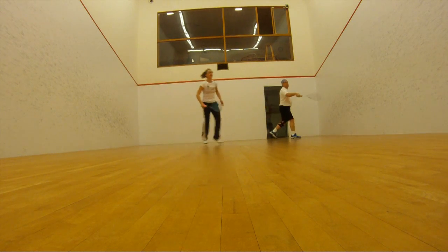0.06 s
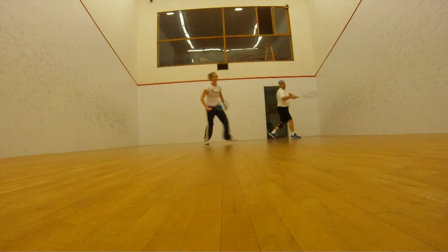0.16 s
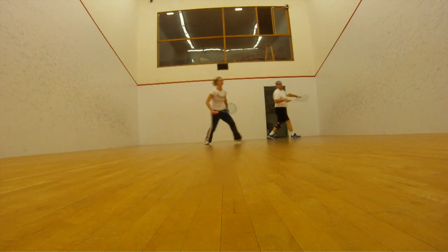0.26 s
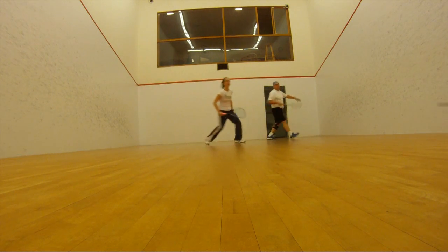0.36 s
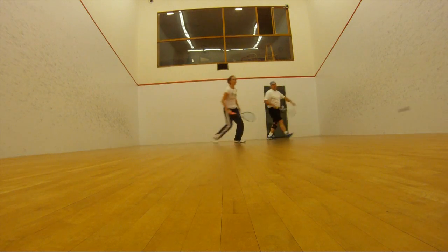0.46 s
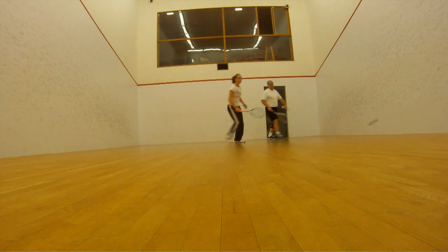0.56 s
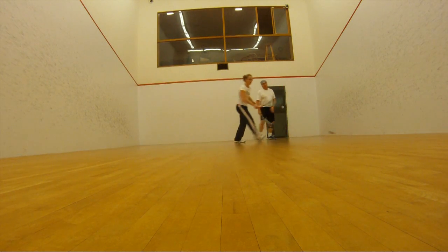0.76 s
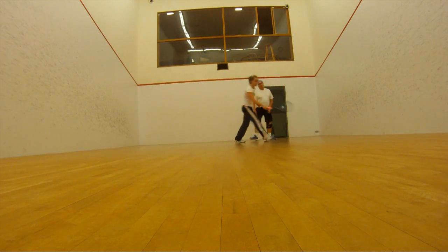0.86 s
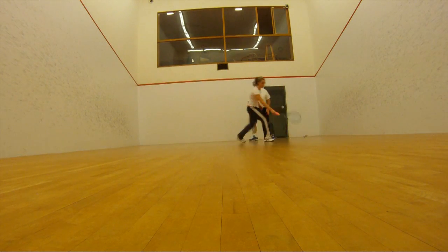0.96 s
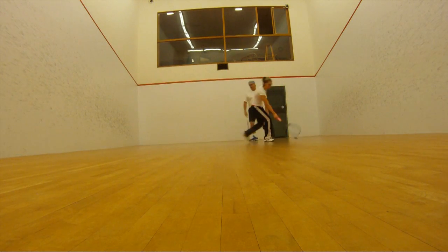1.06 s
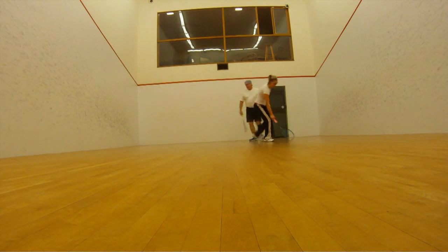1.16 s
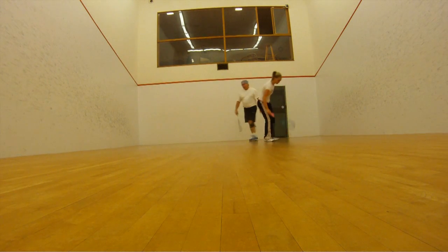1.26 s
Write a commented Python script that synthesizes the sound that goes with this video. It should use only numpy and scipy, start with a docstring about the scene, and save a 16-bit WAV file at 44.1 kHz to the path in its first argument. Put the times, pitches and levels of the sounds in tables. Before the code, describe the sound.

A racket hits a squash ball once with a sharp, hollow crack. Quick echoes merge into a long, bright reverberation in the bare indoor court, while shoes thud softly and squeak faintly, heard from floor level.

```python
"""A squash ball is hit hard in a bare indoor court.
First the wash of the rally hangs in the room, fading over steady air.
Then the hit: a bright snap, a sharp crack, and struck modes that give a hollow ring and a low thump.
The walls throw back four slaps, which merge into a long bright reverberation over a boom.
In that tail, shoes thud on the sprung floor and squeak faintly."""
import sys
import numpy as np
from scipy import signal
from scipy.fft import rfft, irfft
from scipy.io import wavfile

SR = 44100
rng = np.random.default_rng(int(sys.argv[2]) if len(sys.argv) > 2 else 0)


def materialize(psi):
    """Save the field psi as 16-bit PCM at rate SR to the path in sys.argv[1].

    A 1-D psi becomes a single channel; in a 2-D psi each row is a channel.
    """
    bounded = np.clip(np.atleast_2d(psi).T, -1, 1)
    quanta = np.round(bounded * 32767).astype(np.int16)
    wavfile.write(sys.argv[1], SR, quanta)


N = 57330

# steady air of the hall (frequency [Hz], relative density [dB])
AIR_SPECTRUM = [(40, -18), (120, -2), (300, -8), (700, -10), (1100, -0.5), (1500, -12), (2500, -12.5),
                (5000, -44), (15000, -58)]
# wash of the rally (frequency [Hz], relative density [dB])
WASH_SPECTRUM = [(24, -73), (40, -43), (111, -28), (146, -30), (174, -51), (224, -15), (387, -9.5),
                 (522, -4), (758, -35), (838, -10.5), (1020, -5.5), (1250, -3), (1410, -14), (1640, -7.5),
                 (1770, -16.5), (2010, -0.5), (2450, -14.5), (2710, -30), (2990, -14.5), (5050, -25),
                 (6010, -34.5), (9650, -18.5), (11800, -32.5), (14400, -21), (15500, -34)]
# notes hanging from earlier play (frequency [Hz], width [Hz], level [dB])
WASH_RESONANCES = [(996, 94, -45.5), (1270, 150, -51), (1988, 120, -48), (2714, 180, -47.5)]
# footfalls (time [s], level [dB])
FOOTFALLS = [(0.449, -44), (.515, -32), (.82, -62), (1.0, -44.5), (1.1, -44.5), (1.191, -43)]
# distant shoe squeaks (time [s], frequency [Hz], level [dB])
SHOE_SQUEAKS = [(1.02, 542.6, -46.5), (1.07, 783, -48), (1.085, 1060, -48), (1.091, 525, -50.5),
                (1.194, 534, -45), (1.2, 1076, -58), (1.246, 539, -52)]
# court reverberation (frequency [Hz], relative density [dB])
REVERB_SPECTRUM = [(24, -47), (40, 1.5), (64, -7), (120, 3.5), (197, 1), (325, -4.5), (368, -9.5),
                   (704, -15), (881, -10), (1100, -7.5), (1380, -12.5), (1490, -6.5), (1820, -7),
                   (2110, -1), (2510, -8.5), (3740, -7.5), (4460, -20.5), (5170, -15), (5860, -31.5),
                   (6810, -19), (7710, -21.5), (9650, -14), (11800, -36), (14000, -26), (15500, -33)]
# its decay (frequency [Hz], T60 [s])
REVERB_DECAY = [(70, 2.4), (200, 1.06), (500, 3.94), (1100, 3.6), (2100, 3.2), (3500, 2), (6000, 1.57),
                (9500, 1.92), (14000, 6.4)]
# notes of the hit lingering in the court (frequency [Hz], width [Hz], level [dB])
REVERB_RESONANCES = [(878, 50, -41.5), (1111, 106, -39.5), (1520, 68, -41.5), (2057, 48, -37),
                     (2200, 200, -33.5), (3604, 130, -47.5), (8400, 940, -44), (9900, 430, -47),
                     (14300, 650, -42.5)]
# far-wall returns (delay [s], level relative to the reverberation [dB])
WALL_SLAPS = [(.066, -7), (0.074, 1), (.121, -2), (.1435, -4)]
# snap at contact (frequency [Hz], relative density [dB])
SNAP_SPECTRUM = [(1000, -25), (3000, -19), (4400, 2.5), (6000, -13), (7100, -2), (8300, -2), (10500, 6),
                 (12000, -33), (14000, -12)]
# crack of the hit (frequency [Hz], relative density [dB])
CRACK_SPECTRUM = [(24, -47), (40, -20), (85, -14), (158, -11), (218, -11.5), (449, -17), (881, -4),
                  (973, -12.5), (1100, 0.5), (1310, -16), (1450, -11), (1680, -4), (2330, -7.5), (2510, -2),
                  (2840, -12), (3740, -7), (4030, -24), (5050, -14.5), (6010, -28), (8110, -19),
                  (10100, -23), (11200, -28), (12100, -55), (13300, -19.5), (15500, -28)]
# its decay (frequency [Hz], T60 [s])
CRACK_DECAY = [(100, 0.18), (400, 0.32), (1000, 0.22), (2500, 0.11), (5000, 0.17), (14000, 0.24)]
# modes rung by the hit (frequency [Hz], relative level [dB], T60 [s])
STRUCK_MODES = [(111.4, -31.5, 1.2), (175.6, -23.5, 0.66), (210, -20, 0.61), (304.2, -26.5, 0.6),
                (726.3, -20, 0.24), (906, -15, 0.17), (1092, -15.5, 0.33), (1099, -15.5, 0.19),
                (1430, -16.5, 0.1), (1670, -12, 0.097), (1740, -15, 0.11), (1924, -21.5, 0.28),
                (2177, -18, 0.22), (2467, -22, 0.084), (2650, -6.5, 0.067), (3735, -15, 0.077)]

HIT_S = 0.2365
AIR_DB, WASH_DB = -46, -37
REVERB_DB, REVERB_BUILD_S, BOOM_DB = -23.5, 0.038, -34.5
SNAP_DB, CRACK_DB, RING_DB = -20, -13, -2
LOW_CUT_HZ, HIGH_CUT_HZ, NOTCH_HZ = 63, 15250, 12000
DIP_HZ, DIP_WIDTH_HZ, DIP_DEPTH = 6100, 550, 0.46

TIME_S = np.arange(N) / SR
BIN_HZ = np.arange(N // 2 + 1) * SR / N


def undb(db):
    """Decibels to gain."""
    return 10 ** (np.asarray(db) / 20)


def on_log_axis(hz, points):
    """Interpolate (frequency [Hz], value) points over log frequency."""
    point_hz, values = np.array(points, float).T
    return np.interp(np.log(np.maximum(hz, 1)), np.log(point_hz), values)


def diffuse(gain):
    """Sound arriving by countless paths: given spectrum, random phases, rms 1."""
    x = irfft(gain * np.exp(2j * np.pi * rng.random(len(gain))), N)
    return x / x.std()


def coloured(spectrum):
    """Diffuse sound shaped by (frequency [Hz], relative density [dB]) points."""
    return diffuse(undb(on_log_axis(BIN_HZ, spectrum)))


def resonant(hz, width_hz):
    """Diffuse sound around one resonance."""
    return diffuse(1 / (1 + ((BIN_HZ - hz) / width_hz * 2) ** 4))


def notes(resonances):
    """Sum of narrow diffuse resonances."""
    return sum(undb(db) * resonant(hz, width_hz) for hz, width_hz, db in resonances)


def envelope(start_s, rise_s, t60_s, hold_s=0):
    """Linear attack; exponential decay from hold_s after the start."""
    age_s = TIME_S - start_s
    attack = np.clip(age_s / max(rise_s, 1 / SR), 0, 1)
    return attack * undb(-60 * np.maximum(age_s - hold_s, 0) / t60_s)


def die_away(x, decay, start_s, rise_s, hold_s=0):
    """Fade each octave at its own T60."""
    octave = np.log2(np.clip(BIN_HZ, 64, 16384))
    spectrum, faded = rfft(x), 0
    for k in range(6, 15):
        band = irfft(spectrum * np.maximum(1 - abs(octave - k), 0), N)
        faded = faded + band * envelope(start_s, rise_s, on_log_axis(2 ** k, decay), hold_s)
    return faded


def hall():
    """Wash and notes of earlier play fade over steady air."""
    wash = undb(WASH_DB) * coloured(WASH_SPECTRUM) + notes(WASH_RESONANCES)
    air = undb(AIR_DB) * coloured(AIR_SPECTRUM)
    return wash * envelope(0, rise_s=0, t60_s=2.78) + air


def shoes():
    """Dull footfalls on the sprung floor and faint squeaks, smeared by the room."""
    thuds = sum(undb(db) * resonant(hz=172, width_hz=44) * envelope(at_s, rise_s=0.007, t60_s=0.18)
                for at_s, db in FOOTFALLS)
    squeaks = sum(undb(db) * resonant(hz, width_hz=11.7) * envelope(at_s, rise_s=0.0095, t60_s=0.79)
                  for at_s, hz, db in SHOE_SQUEAKS)
    return thuds + squeaks


def reverberation():
    """Reflections merge into a long tail with a slow boom and lingering notes."""
    tail = undb(REVERB_DB) * die_away(coloured(REVERB_SPECTRUM), REVERB_DECAY, HIT_S, REVERB_BUILD_S)
    boom = undb(BOOM_DB) * resonant(hz=77, width_hz=22) * envelope(HIT_S, rise_s=0.072, t60_s=0.86)
    lingering = notes(REVERB_RESONANCES) * envelope(HIT_S, REVERB_BUILD_S, t60_s=2.6)
    return tail + boom + lingering


def wall_slaps():
    """The far walls return short bursts in the court's colour, with stronger notes."""
    bursts = sum(undb(db) * envelope(HIT_S + delay_s, rise_s=0.0012, t60_s=0.017, hold_s=0.0033)
                 for delay_s, db in WALL_SLAPS)
    reflected = undb(REVERB_DB) * coloured(REVERB_SPECTRUM) + 2 * notes(REVERB_RESONANCES)
    return bursts * reflected


def ball_hit():
    """Contact snap, a crack thickened by the nearest surfaces, and the ring of the struck modes."""
    crack = die_away(coloured(CRACK_SPECTRUM), CRACK_DECAY, HIT_S, rise_s=0.0035, hold_s=0.016)
    ring = 0
    for hz, db, t60_s in STRUCK_MODES:
        mode = np.sin(2 * np.pi * (hz * TIME_S + rng.random()))
        ring = ring + undb(db) * mode * envelope(HIT_S, rise_s=0.0075, t60_s=t60_s)
    snap = coloured(SNAP_SPECTRUM) * envelope(HIT_S, rise_s=0.0026, t60_s=0.039, hold_s=0.0056)
    return undb(SNAP_DB) * snap + undb(CRACK_DB) * crack + undb(RING_DB) * ring


def scene():
    """Mono mix, heard from the floor at one end of the court."""
    return (ball_hit() + reverberation() + wall_slaps() + shoes() + hall())[None]


def housing(x, above_hz=3800, gain=0.4):
    """The microphone's case adds a brief diffuse ring that ripples the treble."""
    ring = diffuse(1. * (BIN_HZ > above_hz)) * envelope(0, rise_s=0, t60_s=0.022)
    ring = gain * ring / np.sqrt(np.sum(ring ** 2))
    return x + signal.fftconvolve(x, ring[None])[:, :N]


def record(dry):
    """Microphone: case ring, rounded peaks, low cut, two treble notches, high cut."""
    x = np.tanh(housing(dry))
    x = signal.sosfilt(signal.butter(4, LOW_CUT_HZ, "high", fs=SR, output="sos"), x)
    dip_band = signal.lfilter(*signal.iirpeak(DIP_HZ, Q=DIP_HZ / DIP_WIDTH_HZ, fs=SR), x)
    x = x - DIP_DEPTH * dip_band
    x = signal.lfilter(*signal.iirnotch(NOTCH_HZ, Q=20, fs=SR), x)
    return signal.sosfilt(signal.ellip(10, 0.2, 80, HIGH_CUT_HZ, fs=SR, output="sos"), x)


dry = scene()
out = record(dry)
materialize(out)
```